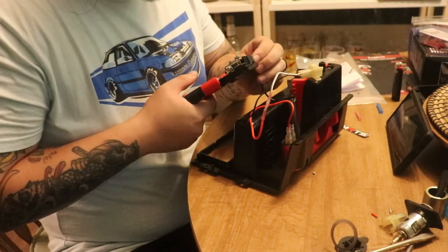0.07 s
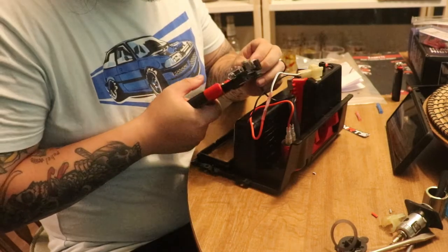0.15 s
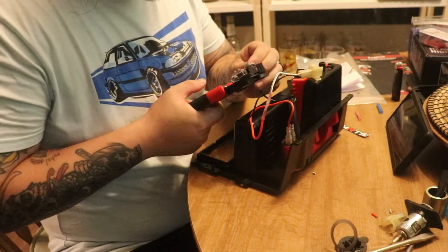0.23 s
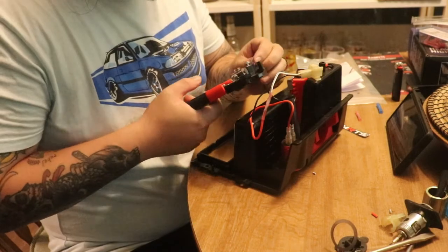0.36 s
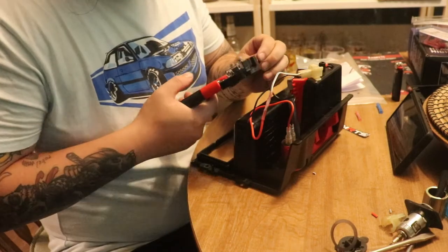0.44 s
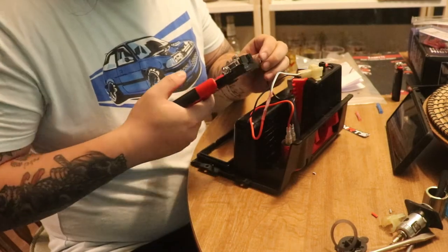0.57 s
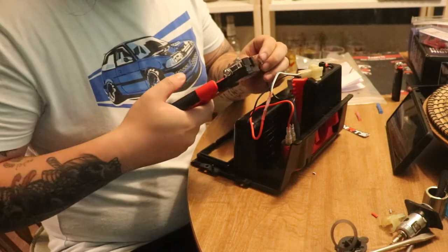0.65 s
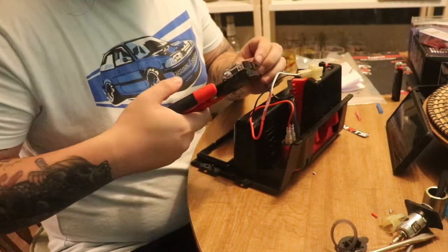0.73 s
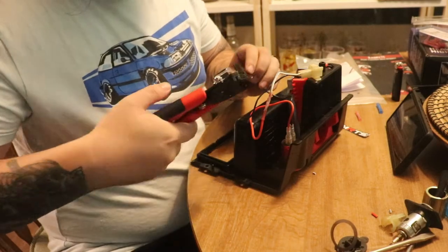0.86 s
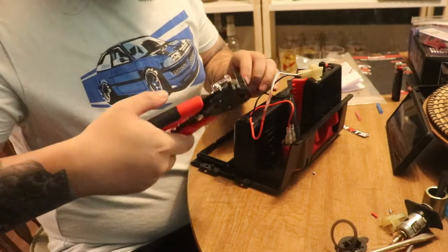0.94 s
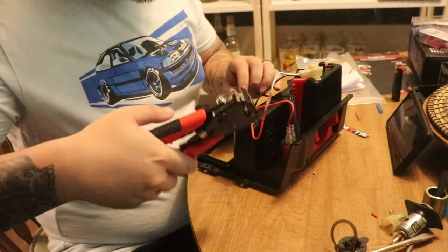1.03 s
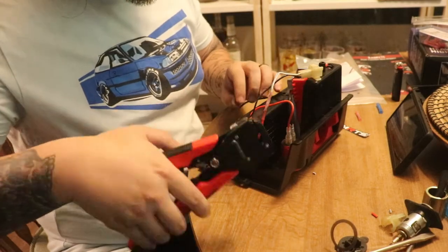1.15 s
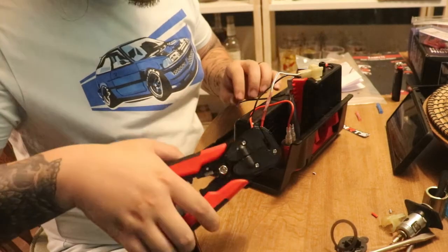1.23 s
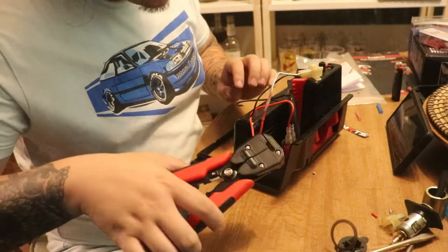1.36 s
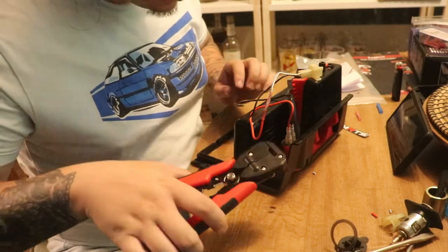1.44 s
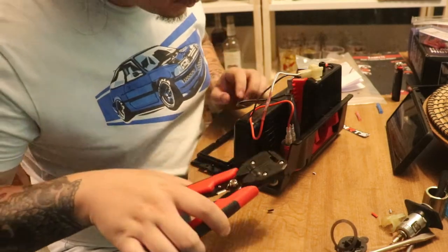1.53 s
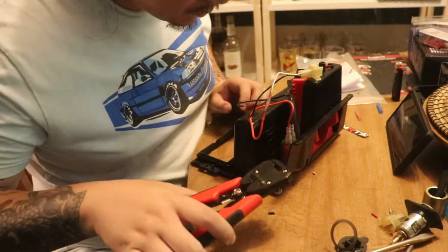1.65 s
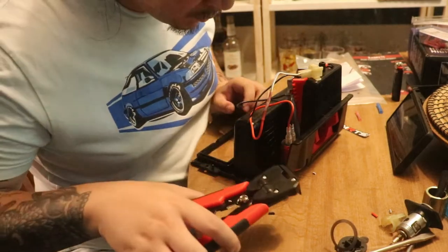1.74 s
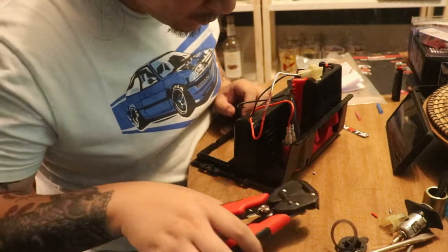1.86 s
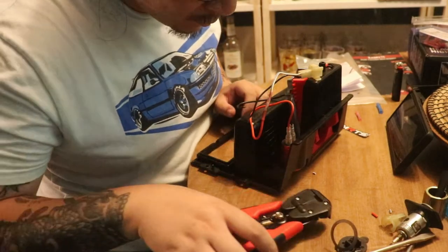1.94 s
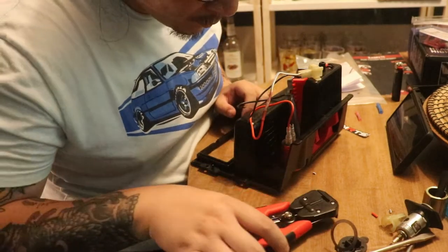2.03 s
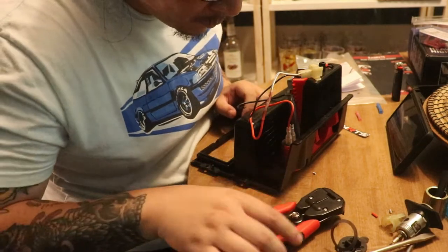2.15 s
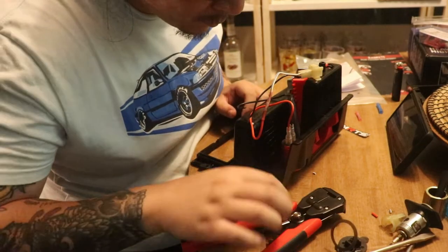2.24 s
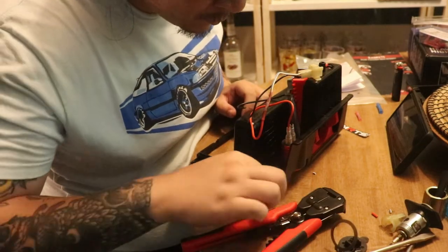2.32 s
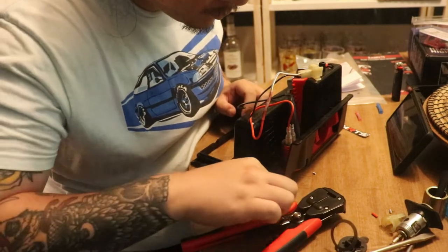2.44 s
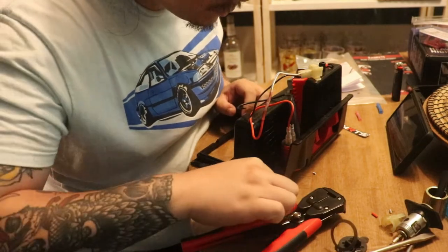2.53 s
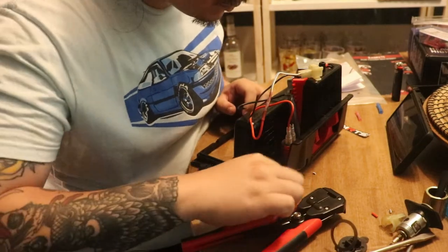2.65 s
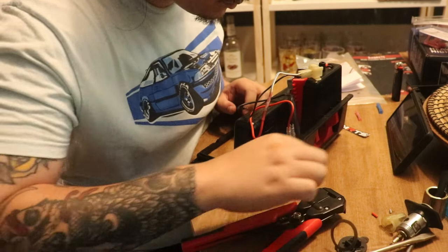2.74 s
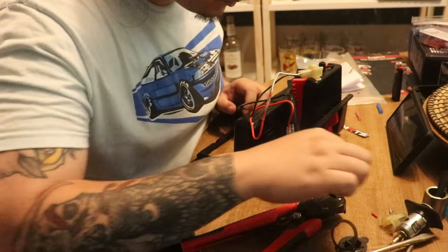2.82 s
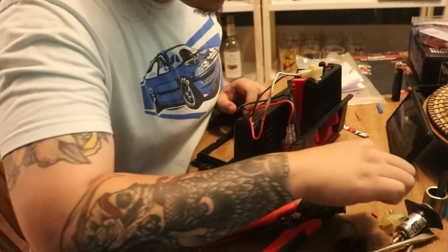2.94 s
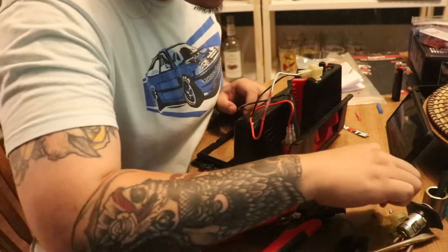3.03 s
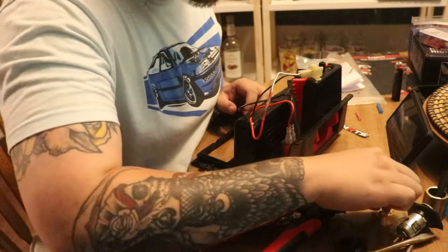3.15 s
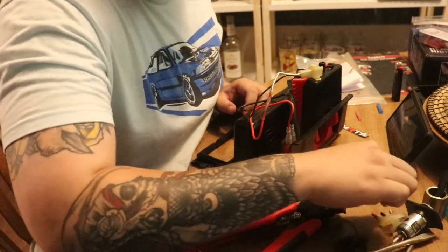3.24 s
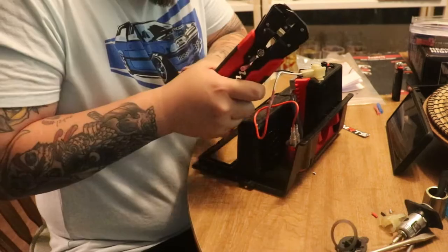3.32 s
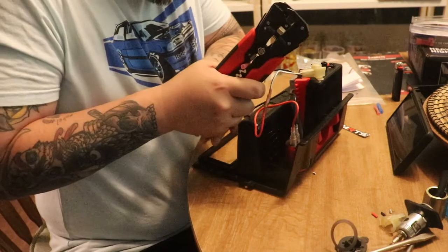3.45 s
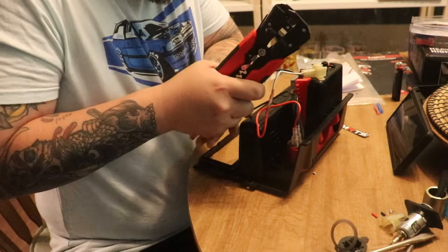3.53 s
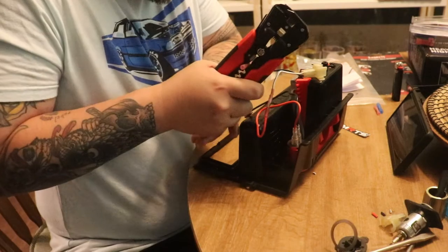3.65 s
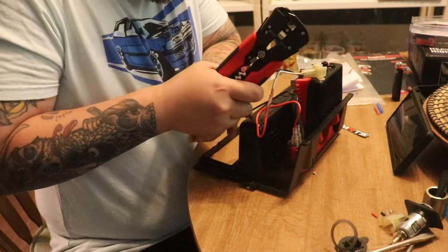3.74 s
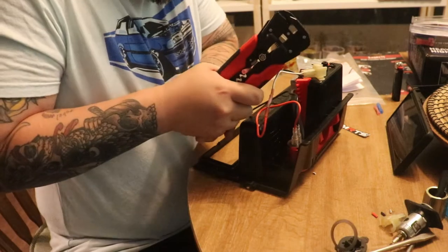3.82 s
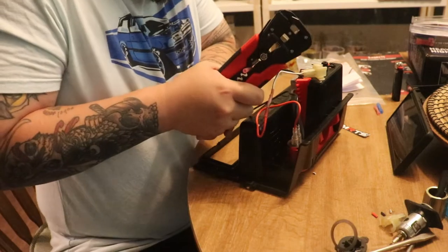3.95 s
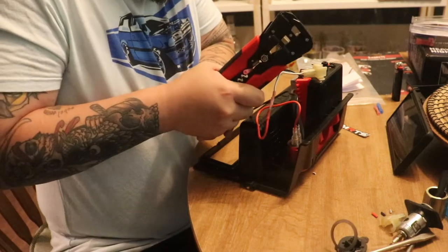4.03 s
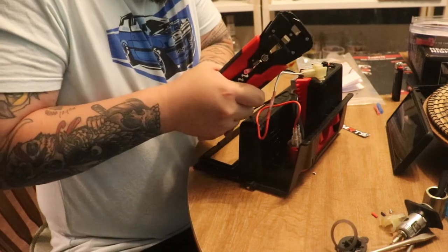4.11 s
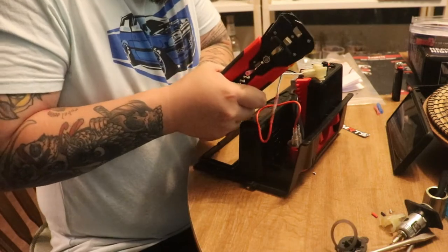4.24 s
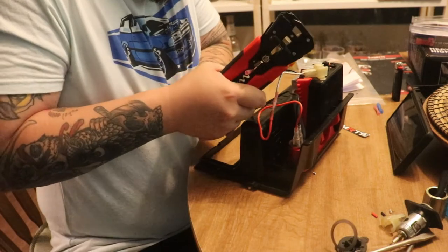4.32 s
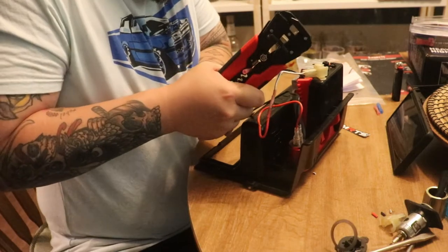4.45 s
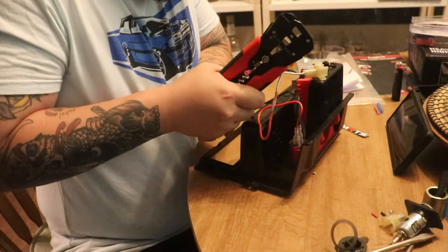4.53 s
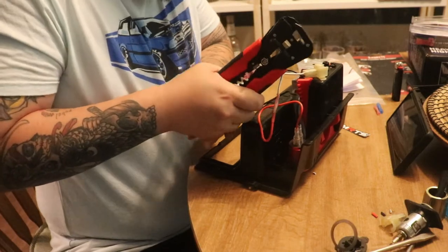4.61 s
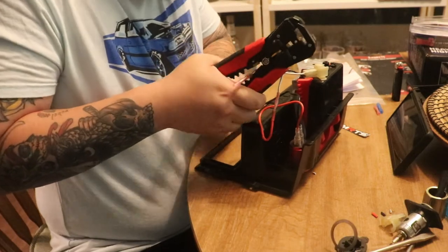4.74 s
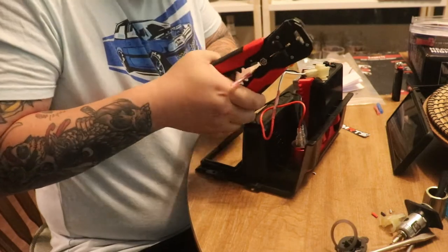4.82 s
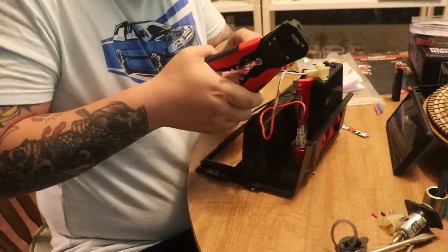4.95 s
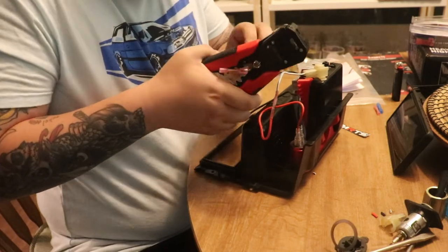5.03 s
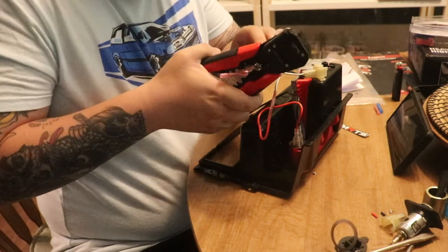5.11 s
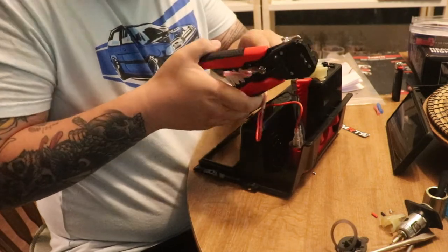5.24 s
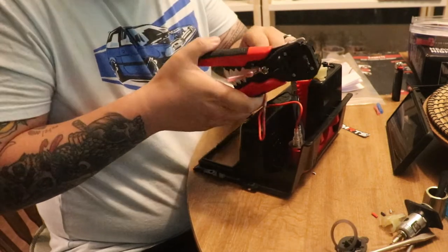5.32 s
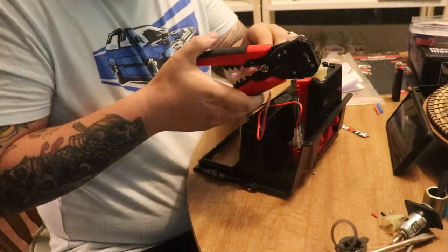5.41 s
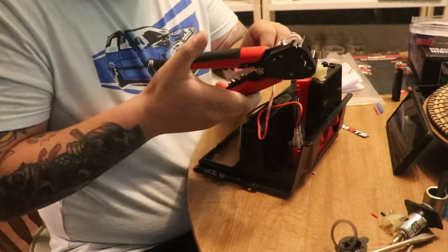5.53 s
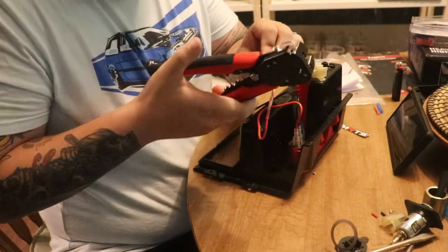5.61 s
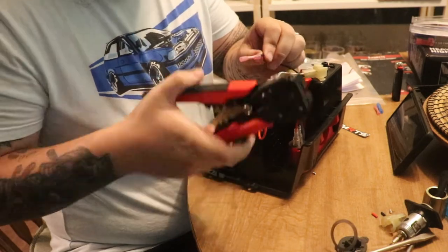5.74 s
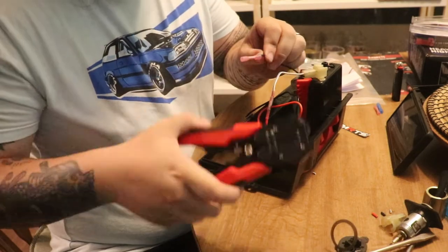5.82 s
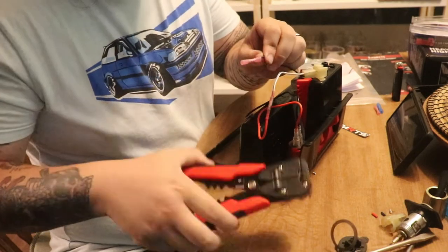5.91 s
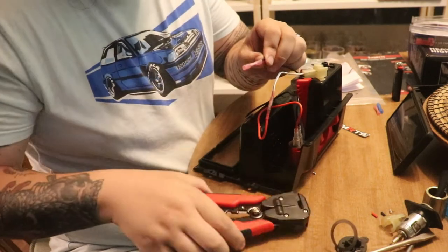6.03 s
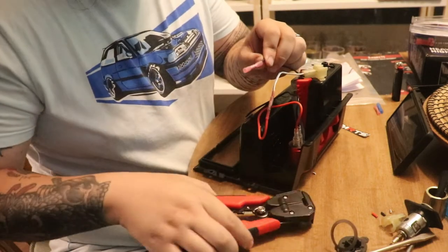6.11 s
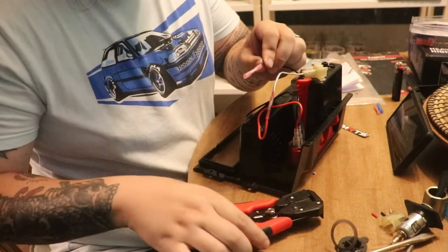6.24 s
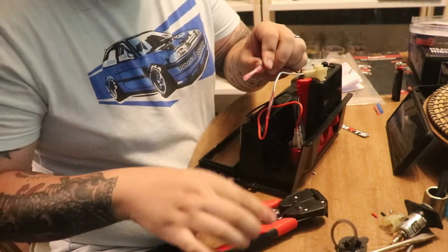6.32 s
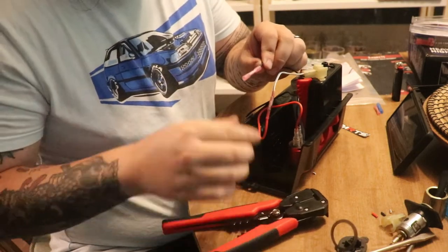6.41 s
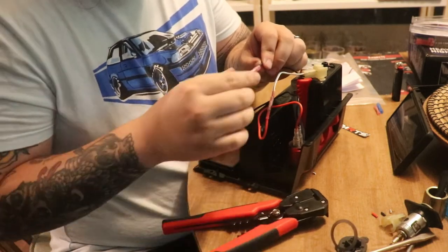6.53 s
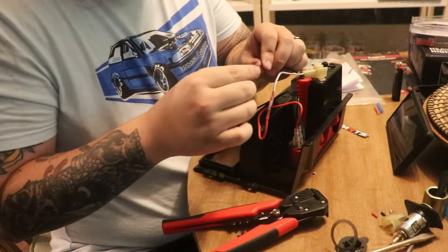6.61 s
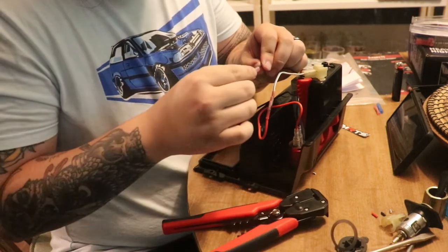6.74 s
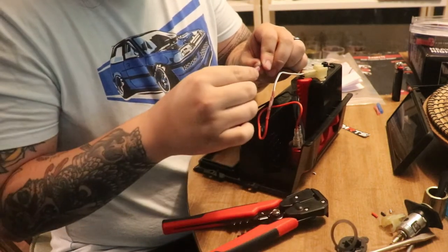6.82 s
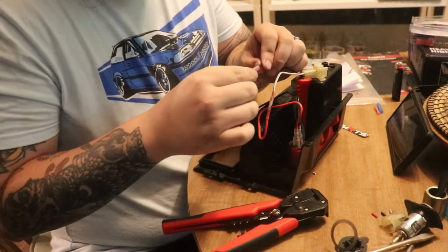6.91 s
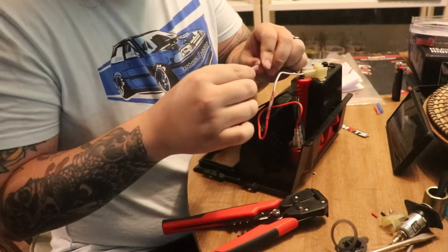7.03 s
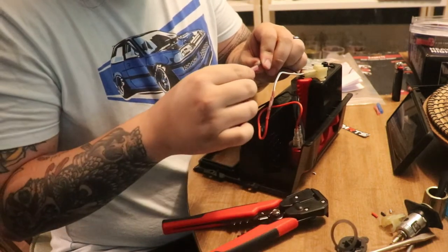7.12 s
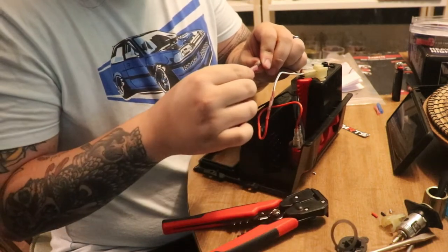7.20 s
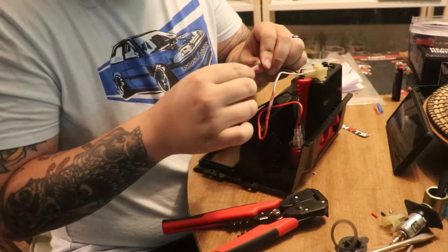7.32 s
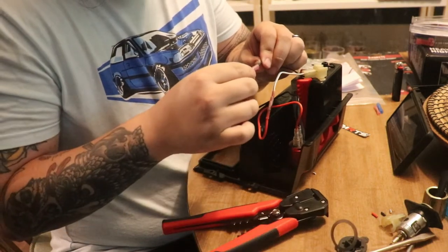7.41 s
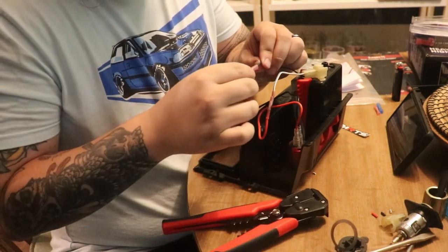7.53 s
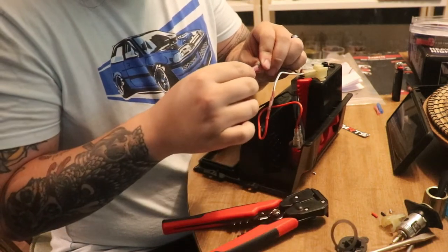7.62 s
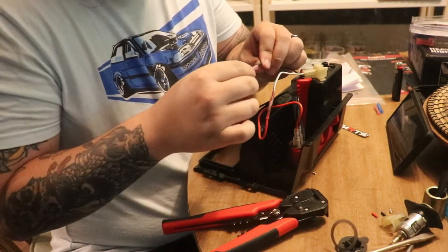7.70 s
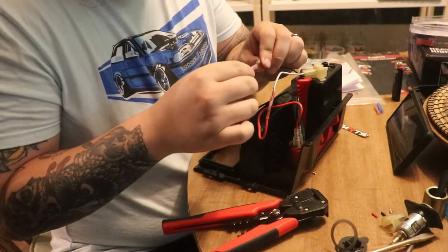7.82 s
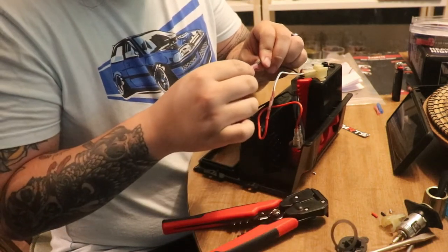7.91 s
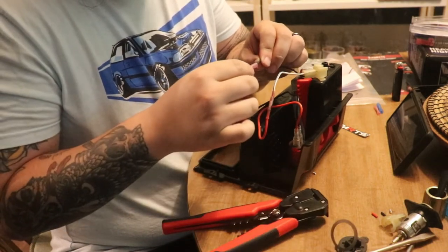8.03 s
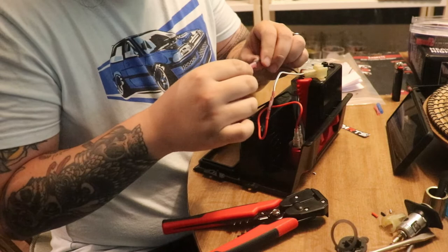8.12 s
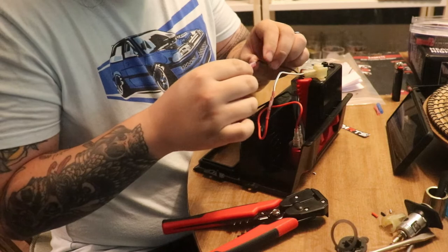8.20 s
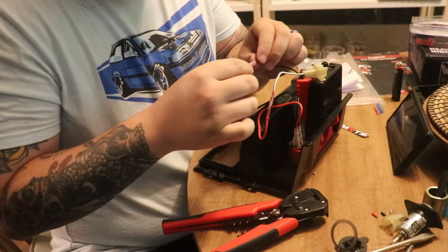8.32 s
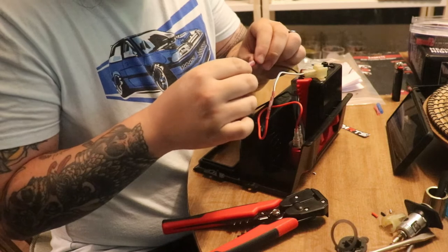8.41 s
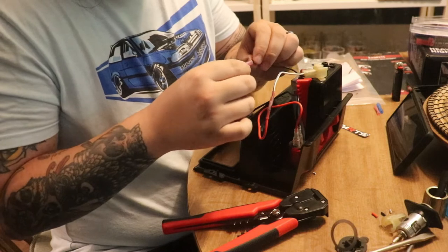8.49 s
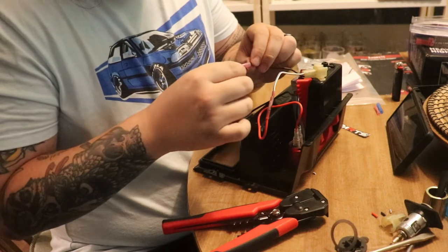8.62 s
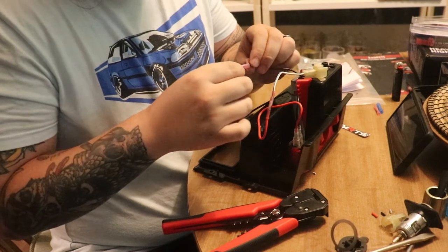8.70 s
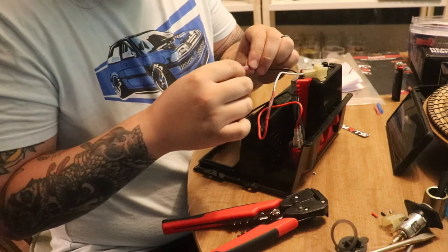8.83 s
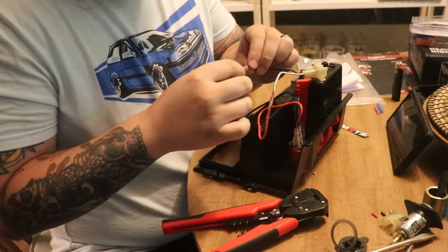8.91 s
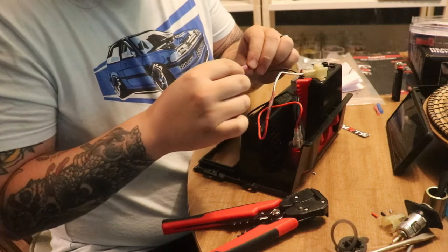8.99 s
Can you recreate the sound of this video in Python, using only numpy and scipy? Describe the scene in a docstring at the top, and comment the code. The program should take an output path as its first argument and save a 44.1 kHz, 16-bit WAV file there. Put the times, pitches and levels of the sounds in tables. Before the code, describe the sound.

In a small, live room, a wire stripper snaps sharply and springs open with clicks and a thin ping. It is laid on a wooden table with a loud clatter, then picked up. Tugged wires tick and creak in a plastic housing, and the steel jaws snap again. The tool goes down with two hard knocks, and a few faint tugs follow over soft microphone hiss.

```python
"""In a small live room, a wire stripper snaps through insulation and springs open, its spring pinging.
It is laid on a wooden table, then picked up; the sound drops out for an instant.
Tugged wires tick and creak in the plastic housing they hang from, and the jaws snap again.
The tool is laid down, head first, then handles; a few faint tugs follow.
Throughout, a limiter holds the loud blows."""
import sys
import numpy as np
from scipy import signal
from scipy.fft import rfft, irfft, next_fast_len
from scipy.io import wavfile
from scipy.ndimage import uniform_filter1d, minimum_filter1d

SR = 44100
rng = np.random.default_rng(int(sys.argv[2]) if len(sys.argv) > 2 else 0)


def put_to_file(sound):
    """Save the sound as 16-bit audio at rate SR, in the file named by the first command-line argument."""
    columns = np.atleast_2d(sound).T  # one column per channel
    safe = np.clip(columns, -1, 1)
    whole_steps = np.round(safe * 32767)
    wavfile.write(sys.argv[1], SR, whole_steps.astype(np.int16))


N = 399546
TAPS = 8192
BIN_HZ = np.fft.rfftfreq(TAPS, 1 / SR)
TIME_S = np.arange(N) / SR

# jaw snaps: start_s, release_db, slam_db, rebound_db, travel_s, bass_db, treble_db, ring_hz
SNAPS = [(0.1455, -17.5, -9, -21, 0.0083, 6, -2.5, 2240), (.605, -17, -14, -21.5, .0058, -24, 5.5, 3550),
         (4.920, -11.5, -16, -39, 0.0047, -34, 8, 4140)]
def jaws(rebound_s=0.009, release_ring_hz=4700):
    """Steel jaws let go, slam and bounce once; release and bounce are brighter and shorter."""
    out = np.zeros(N)
    for start_s, release_db, slam_db, rebound_db, travel_s, bass_db, treble_db, ring_hz in SNAPS:
        slam_s, bright_db = start_s + travel_s, treble_db + 13
        add(out, start_s, steel_hit(release_db, bass_db, bright_db, release_ring_hz, lift_db=7.5))
        add(out, slam_s, steel_hit(slam_db, bass_db, treble_db, ring_hz, lift_db=11, chatter_s=0.00315))
        add(out, slam_s + rebound_s, steel_hit(rebound_db, bass_db, bright_db, ring_hz, lift_db=2))
    return out


# steel colour: freq_hz, gain_db
STEEL_COLOUR = [(100, -20.5), (300, -15), (800, -6.5), (1200, -2.5), (2300, 2.5), (3300, 4), (4200, -2),
                (5200, 4), (6700, -5.5), (8500, -4), (12000, -5.5), (16000, -20.5)]
# steel resonances: freq_hz, width_hz, lift_db
STEEL_MODES = [(1235, 135, 6.5), (2187, 390, 2.5), (3160, 220, 2), (5300, 333, 0.5), (7870, 950, 4),
               (10200, 279, 1)]
def steel_body_db():
    """Response of the steel tool."""
    return curve(STEEL_COLOUR) + peaks_db(STEEL_MODES)


def steel_hit(level_db, bass_db, treble_db, ring_hz, lift_db, chatter_s=0.002):
    """A contact rings the tool."""
    spot = spot_db((600, 1200, 4000, 11000), bass_db, treble_db, ring_hz, lift_db, width_ratio=0.18)
    tail = shudder(level_db=-1, decay_s=0.013, cutoff_hz=7200)
    return blow(steel_body_db() + spot, level_db, chatter_s, tail)


# jaw and pivot clicks: start_s, level_db, treble_db, ring_hz
CLICKS = [(0.18, -24.5, 11, 8850), (.244, -30, 2, 2150), (.285, -34, 3.5, 2270), (0.3305, -26, 11, 2230),
          (.387, -24.5, 8, 5450), (1.5015, -27.5, -1, 2660), (1.574, -38.5, 4, 2380),
          (1.617, -43.5, 3, 2730), (3.309, -27, -3, 3260), (3.353, -30.5, -4.5, 900),
          (3.421, -36, -1, 4600), (3.464, -33.5, -10, 3080), (3.486, -35.5, -10, 3100),
          (4.616, -27.5, -11, 3040), (4.635, -40, -3, 2760), (4.648, -37, -13, 3040),
          (4.683, -32, -8, 3060), (4.694, -28.5, -2.5, 2760), (4.753, -26.5, 3.5, 3350)]
def clicks(bass_db=5):
    """Jaws and pivot touch lightly."""
    out = np.zeros(N)
    for start_s, level_db, treble_db, ring_hz in CLICKS:
        add(out, start_s, steel_hit(level_db, bass_db, treble_db, ring_hz, lift_db=4.5))
    return out


# insulation scrape, then pivot scrape: start_s, length_s, level_db, fade_db_per_s, treble_db
SCRAPES = [(0.168, 0.15, -31.5, 130, 4), (3.535, 0.041, -48.5, 20, -24)]
def scrapes():
    """Gritty slips tick in the jaws and fade."""
    out = np.zeros(N)
    for start_s, length_s, level_db, fade_db_per_s, treble_db in SCRAPES:
        age_s = TIME_S - start_s
        tilt_db = curve([(900, -6), (2500, 1), (4000, -1), (8500, treble_db), (15000, treble_db - 10)])
        force = slips(rate_per_s=250, spread_db=1)
        tick = signal.fftconvolve(contact(decay_s=0.00072), impulse(steel_body_db() + tilt_db))
        grit = unit_rms(signal.oaconvolve(force, tick)[:N])
        out += grit * amp(level_db - fade_db_per_s * abs(age_s)) * ((age_s > 0) & (age_s < length_s))
    return out


# spring pings: start_s, level_db, pitch_hz, t60_s
PINGS = [(.27, -42, 9900, .08), (.331, -24, 11323, .09), (.388, -29, 5055, .025), (.388, -29, 5420, .05),
         (.388, -33, 5740, .06)]
def spring():
    """The return spring rings on in thin decaying sines."""
    out, age_s = np.zeros(N), TIME_S[:TAPS]
    for start_s, level_db, pitch_hz, t60_s in PINGS:
        add(out, start_s, amp(level_db - 60 * age_s / t60_s) * np.sin(2 * np.pi * pitch_hz * age_s))
    return out


# tool on table: start_s, level_db, bass_db, treble_db, ring_hz, chatter_s, thud_db,
# clank_db, clank_treble_db, clank_ring_hz
KNOCKS = [(2.050, -4.5, -3, 17, 770, 0.0023, -19, -7, -7.5, 2470),
          (2.113, -17, -10, 4, 660, 0.0067, -38, -27, -10, 3320),
          (2.162, -16.5, 0, -26, 408, .01, -24, -60, -8, 3000),
          (2.2326, 0.5, -9, -3.5, 1580, 0.0031, -14, -40, -12, 2300),
          (3.3134, -18.5, -4.5, -23, 277, 0.00435, -20.5, -49, -5, 3000),
          (6.1024, -3, -5, 6.5, 1790, .006, -14.5, -8.5, 3, 1850),
          (6.3449, -7.5, -5, -5, 1000, 0.0047, -8.5, -12, -19, 2010)]
def table_knocks(settle_s=0.0105):
    """The tool knocks on the wood; its weight follows with a duller thud."""
    out = np.zeros(N)
    for start_s, level_db, bass_db, treble_db, ring_hz, chatter_s, thud_db, *_ in KNOCKS:
        add(out, start_s, wood_hit(level_db, bass_db, treble_db, ring_hz, chatter_s, lift_db=9.5))
        thud = wood_hit(thud_db, bass_db + 4.5, treble_db=-26, ring_hz=714, chatter_s=0.0028, lift_db=6)
        add(out, start_s + settle_s, thud)
    return out


def head_clanks(bass_db=-17.5):
    """The steel head rings at each knock."""
    out = np.zeros(N)
    for start_s, *_, clank_db, treble_db, ring_hz in KNOCKS:
        clank = steel_hit(clank_db, bass_db, treble_db, ring_hz, lift_db=11.5, chatter_s=0.0018)
        add(out, start_s, clank)
    return out


# wood colour: freq_hz, gain_db
WOOD_COLOUR = [(40, -18), (120, -6.5), (250, 0), (750, -2.5), (1100, -3.5), (1500, -10), (2100, -11.5),
               (3400, -10.5), (4200, -26), (5200, -17.5), (6300, -36.5), (8500, -34), (16000, -33.5)]
# wood resonances: freq_hz, width_hz, lift_db
WOOD_MODES = [(258, 35.4, 2.9), (404, 42, 7.4), (648, 10, 3.8), (786, 57, 5.1), (1030, 58, 2.3),
              (1430, 68, 2.1), (1820, 200, 3.3), (2380, 110, 2.93), (3717, 75, 2.7)]
def wood_hit(level_db, bass_db, treble_db, ring_hz, chatter_s, lift_db):
    """A contact rings the table top."""
    spot = spot_db((250, 700, 1200, 7000), bass_db, treble_db, ring_hz, lift_db, width_ratio=0.24)
    tail = shudder(level_db=-7, decay_s=0.009, cutoff_hz=4000)
    return blow(curve(WOOD_COLOUR) + peaks_db(WOOD_MODES) + spot, level_db, chatter_s, tail)


# wire tugs: start_s, level_db, bass_db, treble_db, drag_s
TUGS = [(3.314, -19.5, 17.5, 0, 0.0022), (3.955, -43, -8, -13, 0.0022), (4.134, -42, -17, -4, 0.00095),
        (4.313, -37.5, -2, 6, 0.0062), (4.362, -41, -1, -2, 0.0056), (4.398, -42, -2, -1, 0.0063),
        (4.618, -37.5, 15, -8.5, 0.0047), (4.686, -30.5, 4, -2, 0.0035), (4.698, -30.5, 2, 4, 0.0051),
        (4.756, -27, -7, 2.5, .006), (4.777, -29, 3.5, 3.5, .005), (4.802, -30, -13, 3, .008),
        (5.026, -39, 1, 10, 0.0036), (5.25, -39, 7, 6, 0.0072), (5.408, -36, 5, 6, 0.0057),
        (5.425, -41, 2, -9, 0.0031), (5.503, -43, -16.5, -5, 0.0066), (5.541, -42, 7, -7.5, .004),
        (5.58, -44, -10, -13, 0.0047), (8.176, -43, 13, -7, .004), (8.201, -41.5, 15.5, -3, 0.0035),
        (8.531, -37.5, -0.5, 0.5, .005), (8.618, -43.5, -6, -4.5, 0.0058), (8.724, -39.5, 1.5, 3, .005),
        (9.056, -35.5, -6.5, 3.5, .004)]
def tugs():
    """Wires pull at the housing; the longer the drag, the longer it shudders."""
    out, corners_hz = np.zeros(N), (400, 1100, 1500, 4000)
    for start_s, level_db, bass_db, treble_db, drag_s in TUGS:
        spot = spot_db(corners_hz, bass_db, treble_db, ring_hz=1180, lift_db=7, width_ratio=0.32)
        tail = shudder(level_db=1.5, decay_s=2.6 * drag_s, cutoff_hz=4400)
        add(out, start_s, blow(housing_body_db() + spot, level_db, drag_s, tail))
    return out


# rubbing strokes: start_s, length_s, level_db
RUBS = [(1.224, .1, -56), (3.289, 0.027, -35), (3.452, 0.11, -48), (4.3, 0.09, -50.5),
        (4.737, 0.091, -39.5), (5.062, 0.063, -47.5), (5.216, 0.34, -53.5)]
def rubbing(attack_s=0.0086, release_s=0.019):
    """Hand and wires slip over the housing; each stroke rises, holds and dies."""
    envelope = np.zeros(N)
    for start_s, length_s, level_db in RUBS:
        rise = np.clip((TIME_S - start_s) / attack_s, 0, 1)
        fall = np.exp(-np.maximum(TIME_S - start_s - length_s, 0) / release_s)
        envelope += amp(level_db) * rise * fall
    tilt_db = curve([(400, -4), (1300, 5), (4000, -2), (12000, 7)])
    creak = signal.oaconvolve(slips(rate_per_s=600, spread_db=4), impulse(housing_body_db() + tilt_db))
    return unit_rms(creak[:N]) * envelope


# plastic colour: freq_hz, gain_db
PLASTIC_COLOUR = [(80, -15.5), (250, -6), (400, -3.5), (700, -10), (1300, -12), (2400, -13.5), (3500, -11),
                  (4300, -23.5), (5500, -20.5), (8000, -32.5), (16000, -41)]
# plastic resonances: freq_hz, width_hz, lift_db
PLASTIC_MODES = [(407, 56, 15.3), (752.5, 13.5, 12.6), (1040, 53, 4.5), (1352, 26, 7.1), (2210, 140, 8.1),
                 (2420, 69, 3.3), (3100, 86, 3.6)]
def housing_body_db():
    """Response of the hollow plastic housing."""
    return curve(PLASTIC_COLOUR) + peaks_db(PLASTIC_MODES)


# room decay: freq_hz, t60_s
ROOM_T60 = [(150, 0.68), (400, 0.42), (1040, 0.55), (2760, .5), (7280, 0.34), (15000, 0.6)]
# room colour: freq_hz, gain_db
ROOM_COLOUR = [(60, -3), (150, -3.5), (400, 3), (1000, 2.5), (3000, -1.5), (6000, 2.5), (10000, -10),
               (16000, -20.5)]
# room resonances: freq_hz, width_hz, lift_db
ROOM_MODES = [(138.5, 8.8, 12), (160.7, 8.5, 12), (299.4, 9.3, 9.4), (654, 6.8, 2.4), (944, 9, 2.6),
              (982, 9.4, 3.1), (1540, 11, 3)]
def room(x, build_s=0.0081, patterns=3, shift_hz=2, size=2 ** 15):
    """Dense reflections swell and die band by band; their pattern shifts as the hands move."""
    out, age_s, freq_hz = np.zeros(N), TIME_S[:size], np.fft.rfftfreq(size, 1 / SR)
    colour = amp(curve(ROOM_COLOUR, freq_hz)) * rfft(impulse(peaks_db(ROOM_MODES)), size)
    colour *= np.sqrt(curve(ROOM_T60, freq_hz) / 0.53)  # longer ring, more energy
    swell = 1 - np.exp(-(age_s / build_s) ** 2)
    cycles = TIME_S * shift_hz - np.arange(patterns)[:, None] / patterns
    crossfades = np.maximum(np.cos(2 * np.pi * cycles), 0)
    for share in crossfades / np.linalg.norm(crossfades, axis=0):
        band_hz, frame_s, noise = signal.stft(rng.standard_normal(size), SR, nperseg=256)
        decay = amp(-60 * frame_s / curve(ROOM_T60, band_hz)[:, None])
        tail = signal.istft(noise * decay, SR, nperseg=256)[1][:size]
        spectrum = rfft(tail * swell)
        # flattened, so the room modes stand out
        spectrum /= np.sqrt(abs(uniform_filter1d(abs(spectrum) ** 2, size=21)) + 1e-12)
        tail = irfft(spectrum) * swell * (age_s < 0.8 * age_s[-1])
        out += signal.oaconvolve(x * share, irfft(rfft(tail) * colour))[:N]
    return out


# hiss colour: freq_hz, gain_db
HISS_COLOUR = [(15, -37.5), (25, -6.5), (64, -4), (175, -5), (212, -3), (317, -8.5), (373, -6.5), (463, -9),
               (516, -9), (1440, -15.5), (2350, -18), (14800, -26.5), (16000, -26)]
def hiss(level_db=-52.5):
    """Steady room air and microphone hiss."""
    size = next_fast_len(N, True)
    colour = amp(curve(HISS_COLOUR, np.fft.rfftfreq(size, 1 / SR)))
    noise = irfft(rfft(rng.standard_normal(size)) * colour, size)
    return amp(level_db) * unit_rms(noise[:N])


def blow(body_db, level_db, chatter_s, tail):
    """Contact and shudder drive a body; the energy equals 5 ms at level_db."""
    sound = signal.fftconvolve(contact(chatter_s) + tail, impulse(body_db))[:TAPS]
    return amp(level_db) * sound * np.sqrt(0.005 * SR / np.sum(sound ** 2))


def spot_db(corners_hz, bass_db, treble_db, ring_hz, lift_db, width_ratio):
    """The spot struck tilts the colour and favours one resonance."""
    tilt_db = curve(list(zip(corners_hz, (bass_db, 0, 0, treble_db))))
    return tilt_db + peaks_db([(ring_hz, ring_hz * width_ratio, lift_db)])


def contact(decay_s):
    """Dying chatter of tiny touches: nearly white, energy 1."""
    fade = np.exp(-TIME_S[:TAPS // 2] / decay_s)
    force = rng.standard_normal(len(fade)) * fade
    for _ in range(4):
        spectrum = rfft(force)
        white = irfft(spectrum / (abs(spectrum) + 1e-9))
        force = white * fade / np.sqrt(abs(uniform_filter1d(white ** 2, size=64)) + 1e-20)
    return force / np.linalg.norm(force)


def shudder(level_db, decay_s, cutoff_hz):
    """Waves run on through the struck parts and lose treble."""
    return amp(level_db) * signal.lfilter(*signal.butter(1, cutoff_hz, fs=SR), contact(decay_s))


def slips(rate_per_s, spread_db):
    """Random tiny slips, a few of them large."""
    pulses = (rng.random(N) < rate_per_s / SR) * rng.choice([-1, 1], N)
    return pulses * amp(spread_db * np.minimum(rng.exponential(1, N), 3))


def impulse(gain_db):
    """Minimum-phase impulse response of a gain curve."""
    cepstrum = irfft(np.log(amp(gain_db)))
    cepstrum[1:TAPS // 2] *= 2
    cepstrum[TAPS // 2 + 1:] = 0
    return irfft(np.exp(rfft(cepstrum)))


def peaks_db(modes):
    """Summed resonance peaks."""
    return sum(lift_db / (1 + ((BIN_HZ - hz) / width_hz) ** 2) for hz, width_hz, lift_db in modes)


def curve(points, at_hz=BIN_HZ):
    """Interpolation over log frequency."""
    freq_hz, values = np.transpose(points)
    return np.interp(np.log(at_hz + 1), np.log(freq_hz + 1), values)


def amp(db):
    """Decibels to gain."""
    return 10 ** (np.asarray(db) / 20)


def unit_rms(x):
    """Scales to rms 1."""
    return x / np.sqrt(np.mean(x ** 2) + 1e-20)


def add(mix, start_s, sound):
    """Mixes a sound in at start_s."""
    part = mix[round(start_s * SR):][:len(sound)]
    part += sound[:len(part)]


def scene():
    """Steel, wood and plastic with their echoes, over hiss; mono."""
    steel = amp(-0.4) * (jaws() + clicks() + head_clanks() + scrapes()) + spring()
    wood = amp(-1) * table_knocks()
    plastic = amp(2) * (tugs() + rubbing())
    echoes = room(amp(-8) * steel + amp(-7.5) * (wood + plastic))
    return (steel + wood + plastic + echoes + hiss())[None]


def limiter(x, threshold_db=0.6, recovery_db_per_s=30, slow_share=0.45):
    """A fast stage catches each peak; part of the cut lingers and recovers slowly."""
    recovery_db = TIME_S * recovery_db_per_s
    over_db = np.maximum(20 * np.log10(abs(x) + 1e-9) - threshold_db, 0)
    held_db = np.maximum.accumulate(slow_share * over_db + recovery_db) - recovery_db
    gain_db = minimum_filter1d(-np.maximum(over_db, held_db), size=33)
    return x * amp(uniform_filter1d(gain_db, size=33))


def record(dry):
    """Limiter, clipping, one brief dropout, band limit."""
    dropout = np.interp(TIME_S, [3.249, 3.251, 3.262, 3.274], [1, 0.01, 0.01, 1])
    clipped = np.clip(limiter(dry[0]), -1, 1)
    lowpass = signal.firwin(255, cutoff=16100, window=("kaiser", 8), fs=SR)
    return signal.oaconvolve(clipped * dropout, lowpass, "same")[None]


dry = scene()
out = record(dry)
put_to_file(out)
```